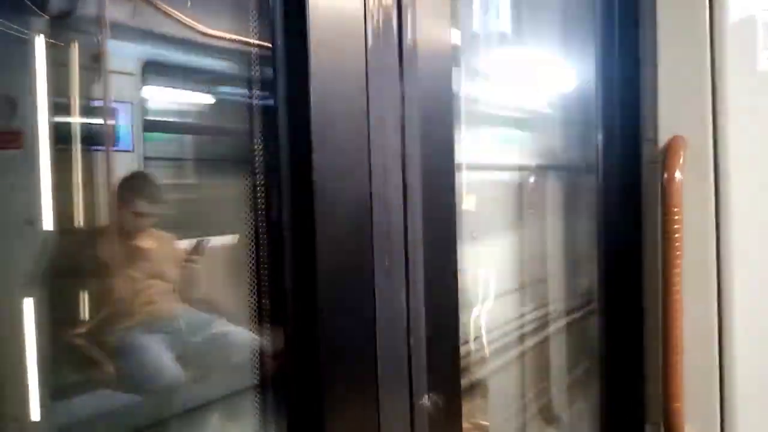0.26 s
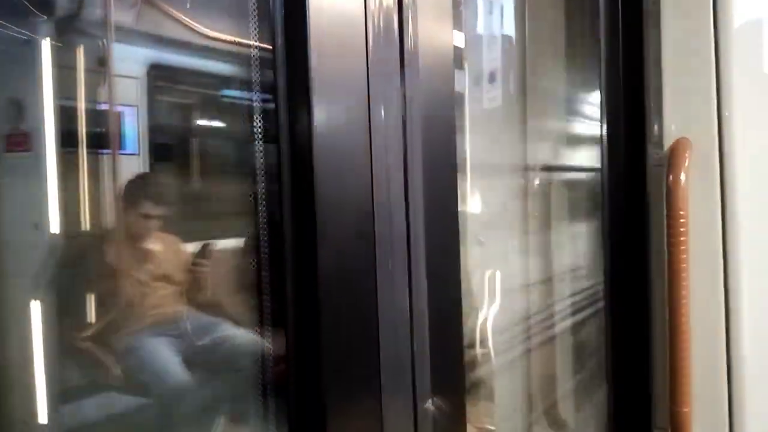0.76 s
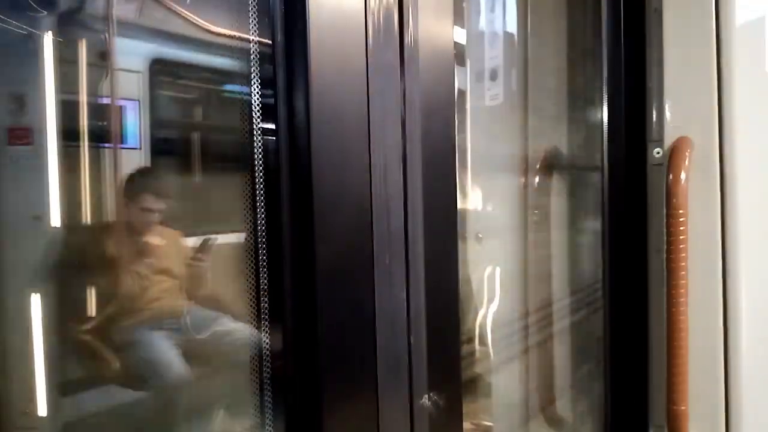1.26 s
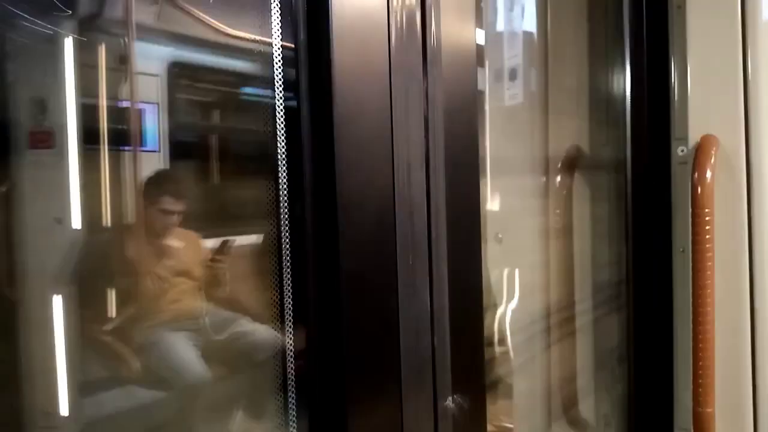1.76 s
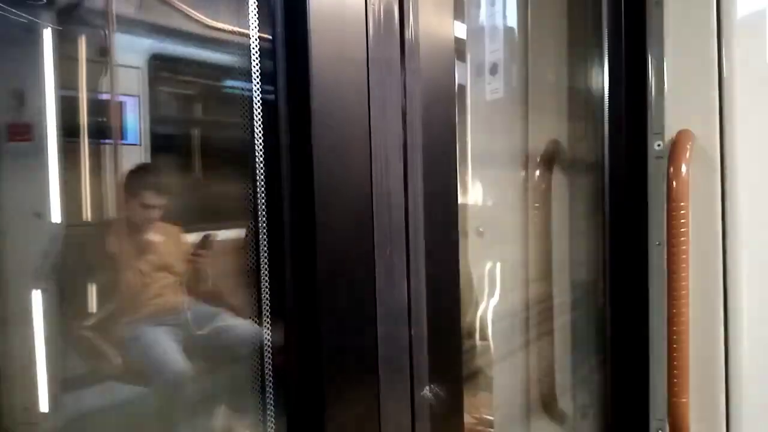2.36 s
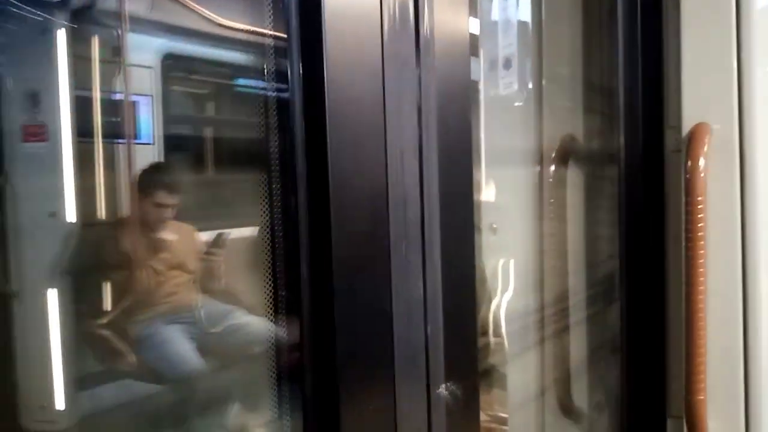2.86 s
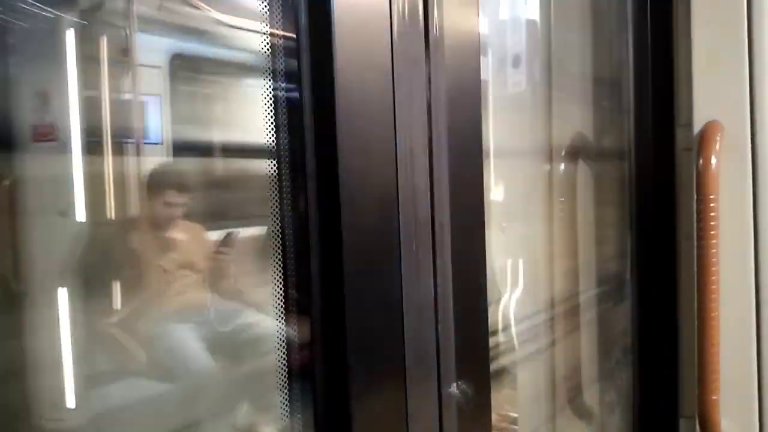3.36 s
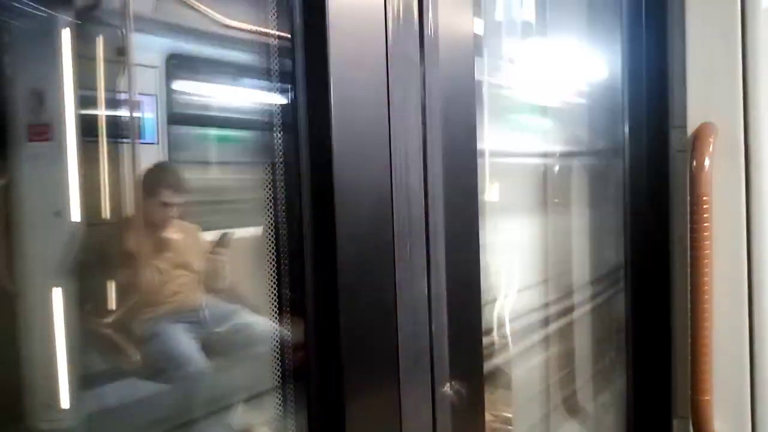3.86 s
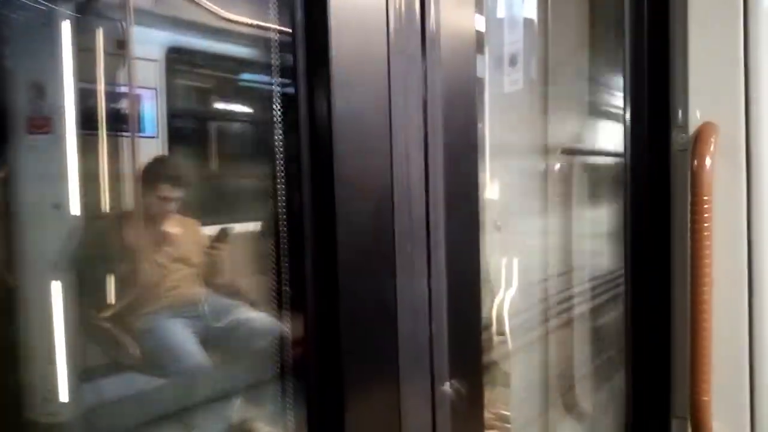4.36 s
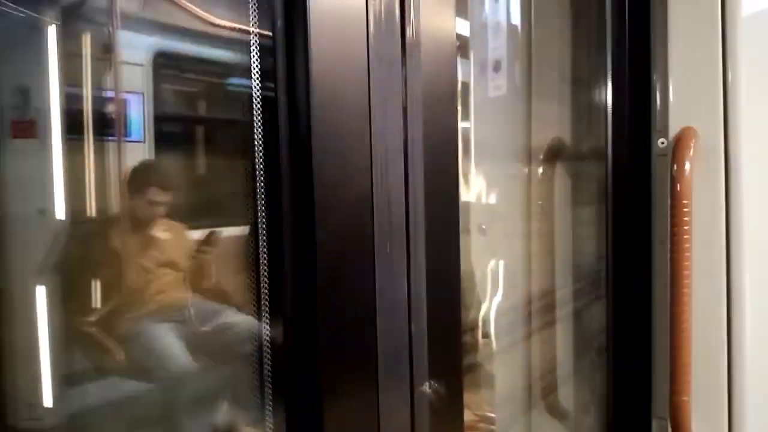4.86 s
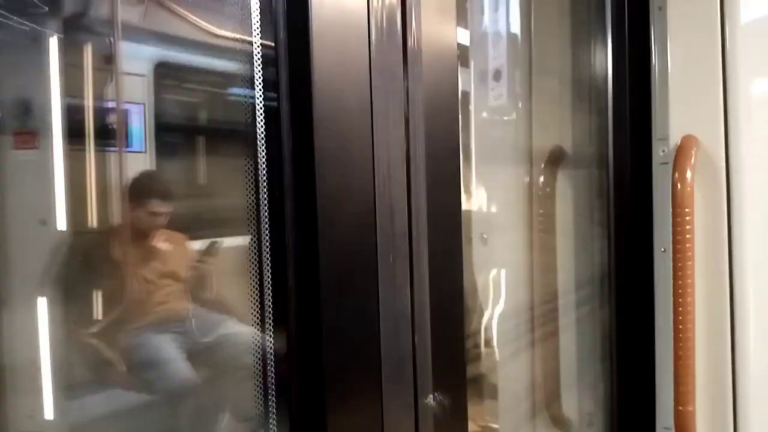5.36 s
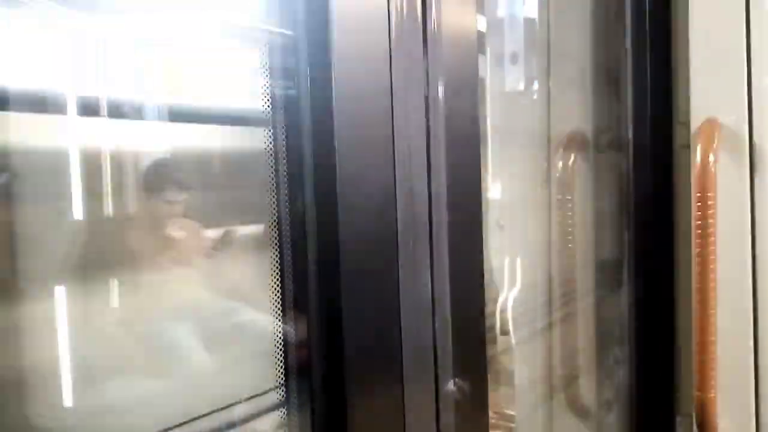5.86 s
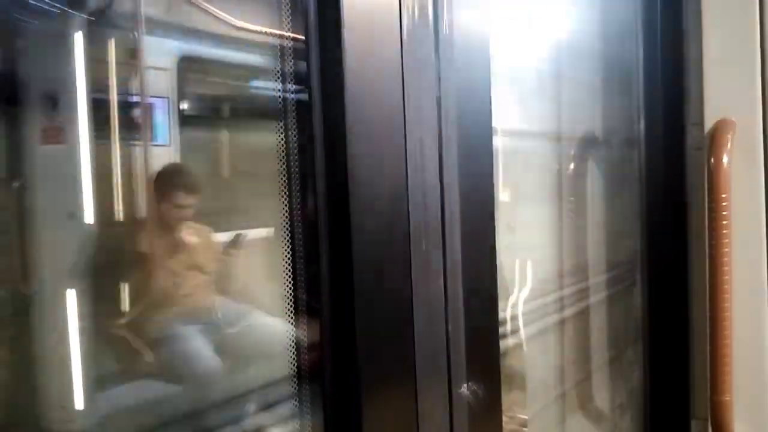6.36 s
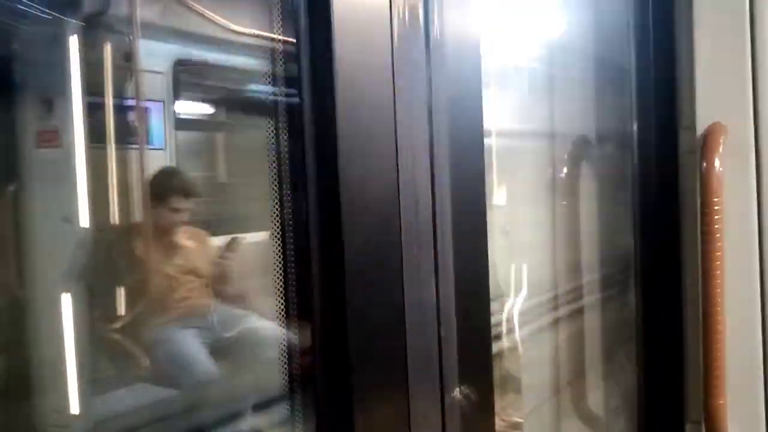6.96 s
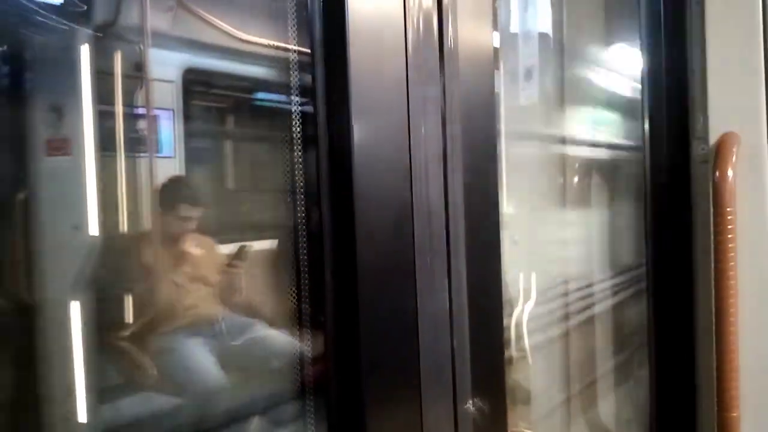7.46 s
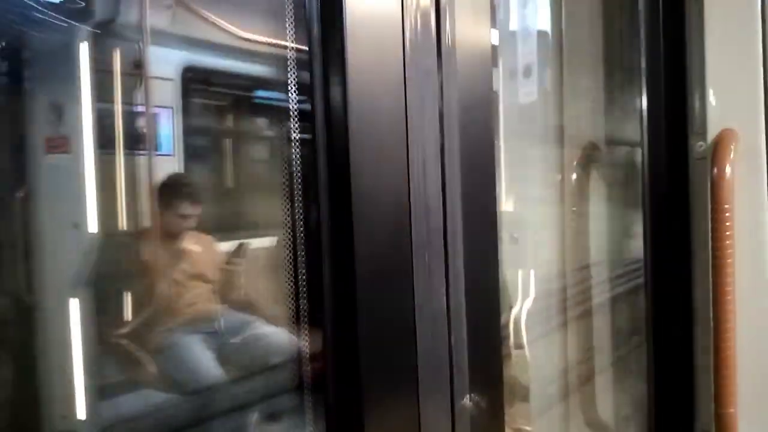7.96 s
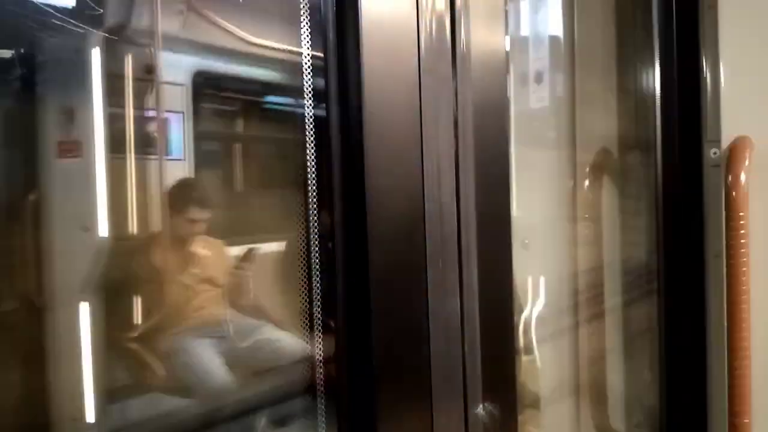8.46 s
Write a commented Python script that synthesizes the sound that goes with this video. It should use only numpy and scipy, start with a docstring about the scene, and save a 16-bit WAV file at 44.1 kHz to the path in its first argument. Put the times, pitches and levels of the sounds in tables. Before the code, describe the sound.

Close beside the doors inside a metro car, a deep body rumble surges over rough rail under a steady tunnel roar and soft hiss. A pure mid-pitched hum swells and fades, with a faint thin whistle above. Knocks begin after one second; gritty scuffs and tiny wheel squeals come later. The hardest knocks land near seven seconds. Door-side stereo, stronger on the left.

```python
"""A metro train runs at nearly steady speed through a tunnel, heard from beside the doors inside a car.
From the start the car body rumbles, surging on rough rail; the tunnel returns the wheels' roar, and
rail hiss leaks through the door seal. Gear teeth hum with the load and the switching drive whistles.
A slipping wheel first sings briefly at 0.2 s; from 1.3 s the bogie knocks against its stops,
and from 1.4 s flanges scuff the rail in short bursts of noise."""
import sys
import numpy as np
from scipy import signal
from scipy.fft import rfft, irfft, next_fast_len
from scipy.io import wavfile
from scipy.ndimage import uniform_filter1d, minimum_filter1d, map_coordinates

SR = 44100
rng = np.random.default_rng(int(sys.argv[2]) if len(sys.argv) > 2 else 0)


def int16_out(signal):
    """Quantize to a 16-bit WAV file."""
    q = np.round(np.clip(np.atleast_2d(signal).T, -1, 1) * 32767)
    wavfile.write(sys.argv[1], SR, q.astype(np.int16))


N = 383669


def amp(db):
    """Level definition: decibels to amplitude gain."""
    return 10 ** (np.asarray(db) / 20)


def unit(x):
    """Normalisation: scale to rms 1, a stereo pair by its left channel."""
    return x / np.std(np.atleast_2d(x)[0])


def times():
    """Uniform sampling: the time of each sample in seconds."""
    return np.arange(N) / SR


def freqs():
    """Discrete spectrum: the frequency of each bin in Hz, kept above zero for logarithms."""
    return np.fft.rfftfreq(next_fast_len(N, True), 1 / SR) + 1e-6


def curves(table):
    """Linear interpolation: the columns of a table, joined by straight lines in time."""
    s, *columns = np.transpose(table)
    return [np.interp(times(), s, column) for column in columns]


def contour(points):
    """Spectral envelope: (f/Hz, value) points joined on a log-frequency axis."""
    hz, value = np.transpose(points)
    return np.interp(np.log(freqs()), np.log(hz), value)


def resonances(modes):
    """Resonance: the lift in dB that a set of modes gives each frequency."""
    return sum(db / (1 + (2 * (freqs() - hz) / width) ** 2) for hz, width, db in modes)


def passband(hz, half_width):
    """Band selection: gain in dB, 12 dB down at the half-width, with extra loss in the far treble."""
    band_db = -40 * np.log10(1 + ((freqs() - hz) / half_width) ** 2)
    treble_loss_db = 10 * np.log10(1 + (freqs() / (2 * hz)) ** 10)
    return band_db - treble_loss_db


def swell(at_s, rise_s, fall_s):
    """Gaussian envelope: grows to 1 at a moment and dies away."""
    t = times() - at_s
    return np.exp(-np.minimum((t / np.where(t < 0, rise_s, fall_s)) ** 2, 20))


def walk(rate):
    """Random modulation: values of spread near 1, drawn rate times a second and joined by lines."""
    steps = rng.standard_normal(4096)
    # the lines between draws reduce the variance to 2/3
    return np.sqrt(3 / 2) * np.interp(times() * rate, np.arange(len(steps)), steps)


def drift(x, share, rate):
    """Time warping: the pitch of a stereo sound wanders by a small share."""
    place = np.arange(N) + np.cumsum(share * walk(rate))
    return np.array([map_coordinates(port, [place], order=1, mode="mirror") for port in x])


def white():
    """White noise: the spectrum of a fresh draw, equally strong at all frequencies on average."""
    return rfft(rng.standard_normal(next_fast_len(N, True)))


# shading of the right microphone port, which faces away from the door: f/Hz, level/dB
SHADE = [(50, -0.5), (140, -9), (290, -8), (360, -12), (470, -6.5), (600, -9), (780, -7), (1100, -11),
         (1700, -9), (2700, -11), (4200, -18.5), (7000, -16)]
# coherence of the two ports: f/Hz, coherence (0-1)
COHERENCE = [(30, 1), (130, 1), (310, 0.93), (400, 0.5), (530, 0.83), (660, 0.3), (840, 0.6), (1200, 0.2),
             (2800, 0.2), (4000, 0.2)]
PORT_LAG_MS = 1.0


def field(colour_db):
    """Partial coherence: the right port gets the noise later, shaded, and mixed with other reflections."""
    left = white()
    alike = np.clip(contour(COHERENCE), 0, 1)
    delayed = np.exp(-2j * np.pi * freqs() * PORT_LAG_MS / 1000) * left
    right = amp(contour(SHADE)) * (alike * delayed + np.sqrt(1 - alike ** 2) * white())
    return unit(irfft(np.array([left, right]) * amp(colour_db))[:, :N])


def tone(hz, scatter, flutter_rate, right_db, lag_ms):
    """Multipath interference: a steady tone plus changing tunnel-wall reflections at each port."""
    carrier = np.exp(2j * np.pi * np.cumsum(hz) / SR)
    ports = []
    for direct in (1, np.exp(-2j * np.pi * np.mean(hz) * lag_ms / 1000)):
        reflections = scatter * (walk(flutter_rate) + 1j * walk(flutter_rate))
        ports.append((carrier * (direct + reflections)).real)
    return unit(np.array(ports)) * amp([[0], [right_db]])


# spectrum of the rumble: f/Hz, relative level/dB
RUMBLE_COLOUR = [(18, -45.5), (30, -33), (50, -25.5), (64, -16), (76, -16.5), (108, -11), (135, -5.5),
                 (200, -1), (240, -4.5), (305, -3), (350, -10), (440, -16.5), (700, -26.5), (2000, -84)]
# resonances of the car body: f/Hz, width/Hz, lift/dB
BODY_MODES = [(75.5, 3.6, 6.5), (91, 6, 3.5), (138.8, 14, 8.5), (172, 4.2, 5), (193.7, 6.8, 2.5),
              (215.6, 8, 3)]
# rough patches of rail: t/s, half length/s, lift of the rumble/dB, ripple f/Hz
ROUGH_PATCHES = [(0.15, 0.16, 3, 202), (0.2, .08, 3, 75), (0.31, 0.045, 3.5, 140),
                 (0.542, 0.049, 11.5, 195), (1.165, 0.062, 10.5, 203), (1.3, .04, 7.5, 290),
                 (1.413, 0.06, 3, 302), (1.563, .04, 4, 302), (1.46, 0.044, 3.5, 150),
                 (1.72, 0.039, 7.5, 160), (1.997, 0.029, 1.5, 200), (2.12, 0.035, 6, 298),
                 (2.175, 0.096, 9, 182), (2.794, 0.034, 12.5, 242), (2.927, 0.085, 14.5, 150),
                 (3.277, 0.03, 3, 300), (3.433, 0.042, 4, 85), (3.75, 0.051, 5.5, 185),
                 (4.193, .05, 7, 194), (4.378, 0.051, 10.5, 214), (4.57, 0.1, 6.5, 175),
                 (4.832, 0.059, 5, 155), (4.977, 0.069, 10, 148), (5.08, 0.037, 9, 85),
                 (5.17, 0.044, 7, 300), (5.25, 0.053, 11.5, 149), (5.344, 0.13, 5.5, 297),
                 (5.754, 0.031, 5, 165), (6.14, 0.13, 5.5, 220), (6.582, 0.03, 5, 190),
                 (6.757, .035, 6, 300), (6.873, 0.058, 6.5, 151), (7.306, 0.069, 6.5, 184),
                 (7.779, 0.059, 10, 156), (8.29, 0.16, 5, 300), (8.42, 0.23, 5.5, 172),
                 (8.62, 0.16, 7, 239)]
# centres of the ranges in which the car body booms: f/Hz
RUMBLE_BANDS = [80, 140, 200, 300]
RUMBLE_DB = -16.5  # on smooth rail


def rumble(steadiness=0.33, reach_octaves=0.57):
    """Forced vibration: rail roughness drives the body's booming ranges, chosen by ripple spacing."""
    boom = rfft(field(contour(RUMBLE_COLOUR) + resonances(BODY_MODES)), next_fast_len(N, True))
    patches = [(db * swell(s, half, half), hz) for s, half, db, hz in ROUGH_PATCHES]
    out = 0
    for centre, share in zip(RUMBLE_BANDS, np.eye(len(RUMBLE_BANDS))):
        # neighbouring ranges cross-fade
        band = irfft(boom * contour(list(zip(RUMBLE_BANDS, share))))[:, :N]
        # the boom's own chance swells are evened by about a third; rough patches lift it further
        surge = uniform_filter1d(band[0] ** 2, size=SR // 7) / np.var(band[0])
        evened_band = band / surge ** (steadiness / 2)
        rough_db = sum(lift * np.exp(-(np.log2(centre / hz) / reach_octaves) ** 2)
                       for lift, hz in patches)
        out = out + evened_band * amp(RUMBLE_DB + rough_db)
    return out


# spectrum of the roar: f/Hz, relative level/dB
ROAR_COLOUR = [(150, -33), (380, 2), (500, -1.5), (590, 7.5), (690, 1.5), (830, -1.5), (1000, -2.5),
               (1400, -5), (2200, -8.5), (2900, -10.5), (4000, -32.5), (7000, -75)]
# ringing modes of the wheels: f/Hz, half-width/Hz, level/dB before ring_db and the roar's level
WHEEL_MODES = [(848, 19, -7), (1143, 61, -6.5), (1583, 80, -3.5), (2138, 150, -4), (2860, 96, -6.5)]
# roar thrown back by the tunnel walls: t/s, level/dB before trim_db
ROAR = [(0.0, -25.5), (0.85, -24.5), (1.5, -25), (2.2, -24.5), (3.8, -24.5), (4.7, -24.5), (5.6, -25),
        (6.6, -24.5), (7.7, -24.5), (8.7, -24)]


def roar(trim_db=6, flicker_db=0.5, ring_db=-12, wander_db=1.84):
    """Radiation and reflection: the tunnel returns the wheels' sound; each mode drifts and flares."""
    level_db, = curves(ROAR)
    wash = field(contour(ROAR_COLOUR)) * amp(flicker_db * walk(15))
    rings = 0
    for hz, half_width, db in WHEEL_MODES:
        ring = drift(field(passband(hz, half_width)), share=.007, rate=4)
        rings = rings + ring * amp(db + ring_db + wander_db * walk(8.3))
    return (wash + rings) * amp(level_db + trim_db)


# spectrum of the hiss: f/Hz, relative level/dB
HISS_COLOUR = [(900, -27), (2000, -8), (2700, -9), (3400, 2.5), (4100, 0), (4800, -5.5), (5200, -10.5),
               (5900, -12.5), (6500, -19), (7100, -29), (7700, -43.5), (8300, -70), (12000, -61.5),
               (15000, -72)]
HISS_DB = -29


def hiss(flicker_db=1.2):
    """Rolling contact noise: steel rolling on steel hisses through the door seal."""
    return field(contour(HISS_COLOUR)) * amp(HISS_DB + flicker_db * walk(24))


# gear pitch, following the speed: t/s, f/Hz
GEAR_PITCH = [(0, 633), (.5, 631.5), (1.7, 631.4), (3, 632.5), (4, 633), (5.5, 634), (6.5, 634.7),
              (8.7, 635.6)]
# load on the gears, as the level of their hum: t/s, level/dB before trim_db
GEAR_LOAD = [(0.0, -48), (0.1, -36), (0.27, -27), (0.48, -29.5), (0.57, -31), (0.66, -26), (1.1, -37.5),
             (1.37, -37), (1.52, -36), (1.66, -33), (1.75, -36), (1.88, -33.5), (2.15, -28), (2.3, -23.5),
             (2.45, -33), (2.8, -30), (3.3, -37), (3.6, -33.5), (3.8, -41), (4.05, -26.5), (4.4, -28),
             (4.54, -36), (4.64, -25), (4.93, -30.5), (5.08, -23.5), (5.2, -31), (5.6, -34), (6.03, -33),
             (6.13, -24.5), (6.4, -30), (6.73, -26), (6.82, -39), (6.95, -46), (7.08, -29), (7.65, -37),
             (8.15, -32), (8.69, -43)]


def gear_hum(trim_db=6.0):
    """Tooth-mesh excitation: the gear teeth sing one pure note that comes and goes with the load."""
    hz, = curves(GEAR_PITCH)
    load_db, = curves(GEAR_LOAD)
    note = tone(hz, scatter=0.027, flutter_rate=10, right_db=-14.0, lag_ms=0.34)
    return note * amp(load_db + trim_db)


# tones of the drive: f/Hz, level/dB relative to the whistle
DRIVE_TONES = [(2040, -14), (2104, -12.5), (2222, -13.5), (2357.5, 1.5), (2491.7, -6), (2762, -7.5),
               (4715, -11)]
# whistle as it comes and goes: t/s, level/dB
WHISTLE = [(0, -39), (.45, -40), (.72, -37), (1.0, -38.5), (1.27, -43), (1.5, -37.5), (2.0, -35.5),
           (2.2, -41), (2.45, -40), (2.72, -38.5), (2.92, -45), (3.1, -38), (3.35, -35.5), (3.58, -39.5),
           (4.05, -35), (4.35, -33), (4.56, -39.5), (4.9, -51), (5.07, -34), (5.4, -41), (5.7, -39.5),
           (6.22, -36), (6.5, -43), (6.72, -41), (7.35, -44), (8.17, -37.5), (8.45, -42), (8.7, -40)]


def drive_whistle(waver_hz=1.2):
    """Magnetic excitation: windings whistle tones, each wavering on its own, that swell and fade together."""
    level_db, = curves(WHISTLE)
    tones = 0
    for hz, db in DRIVE_TONES:
        wavering_hz = hz + waver_hz * walk(5)
        tones = tones + amp(db) * tone(wavering_hz, scatter=0.32, flutter_rate=13,
                                       right_db=-16.5, lag_ms=0.99)
    return tones * amp(level_db)


# moments when a wheel sings: t/s, half length/s, f/Hz, level/dB
SQUEALS = [(0.225, .12, 2850, -32), (3.17, 0.041, 2046, -22), (3.926, 0.064, 1606, -26),
           (3.922, 0.023, 2840, -25), (5.528, .011, 2134, -20.5), (5.544, .011, 3340, -19),
           (5.545, .021, 2820, -19), (7.04, 0.29, 912, -33), (7.69, 0.11, 792, -24)]


def squeals():
    """Self-excited vibration: a slipping wheel briefly locks onto one of its modes and sings."""
    out = 0
    for s, half, hz, db in SQUEALS:
        ring = tone(np.full(N, hz), scatter=.4, flutter_rate=80, right_db=-7, lag_ms=.5)
        out = out + ring * swell(s, half, half) * amp(db)
    return out


# knocks from the bogie: t/s, level/dB, floor thud level/dB, pitch ratio
KNOCKS = [(1.294, -8, -15.5, 0.94), (1.343, -10, -29, 1.12), (2.756, -10, -14, 0.94), (2.871, -8.5, -31, 1),
          (3.809, -17, -17.5, 1.26), (4.462, -6, -29, 0.97), (4.478, -7.5, -38, 1.03),
          (4.5, -5.5, -44, .99), (4.933, -4.5, -33, 0.96), (5.295, -7.5, -31, 0.92), (6.764, -2, -26, .985),
          (6.815, -12, -29, 1.1), (6.894, 2.5, -19, 1.005), (6.926, -5.5, -34, 1), (7.023, -29, -18, 1)]
# what a knock rings with: f/Hz, level/dB before the ring is scaled to peak 1, t60/s
KNOCK_MODES = [(313, 6.5, 0.083), (521, -5, 0.075), (790, -3, 0.08), (831.5, 6, 0.11), (874, -6, 0.055),
               (1043, -7, 0.11), (1138, -0.5, 0.062), (1313, -12, 0.13), (1444, -16, 0.13),
               (1920, -14.5, 0.19)]
# what the floor thuds with: f/Hz, level/dB relative to the thud, t60/s
FLOOR_MODES = [(77.2, -0.5, 0.5), (91, -4.5, 0.37)]


def knocks(car_t60_s=0.35, tail_db=-6, right_db=-8, ring_spread=0.0042, push_s=0.0013,
           floor_rise_s=0.018, clatter_db=-18, clatter_t60_s=0.18):
    """Impact and modal decay: bogie blows on the stops ring, clatter in the panels and thud in the floor."""
    t = np.arange(SR // 2) / SR

    def decaying_modes(modes, ratios):
        """Modal superposition: sines that each lose 60 dB in their t60."""
        return sum(amp(db - 60 * t / t60) * np.sin(2 * np.pi * hz * ratio * t)
                   for (hz, db, t60), ratio in zip(modes, ratios))

    thud = decaying_modes(FLOOR_MODES, np.ones(len(FLOOR_MODES))) * (1 - np.exp(-t / floor_rise_s))
    panels = signal.butter(4, [300, 1600], "bandpass", fs=SR, output="sos")
    out = np.zeros((2, N + SR))
    for s, db, thud_db, pitch in KNOCKS:
        detune = pitch * (1 + ring_spread * rng.standard_normal(len(KNOCK_MODES)))
        ring = decaying_modes(KNOCK_MODES, detune)
        ring = ring * (1 - np.exp(-t / push_s)) ** 2  # a rubber stop pushes softly
        ring = ring / np.abs(ring).max()
        for port, (lag_ms, port_db) in enumerate([(0, 0), (PORT_LAG_MS, right_db)]):
            reverberation = rng.standard_normal(len(t)) * amp(-60 * t / car_t60_s)
            tail = unit(signal.fftconvolve(ring, reverberation)[:len(t)]) * np.std(ring)
            rattle = unit(signal.sosfilt(panels, rng.standard_normal(len(t))))
            clatter = rattle * amp(clatter_db - 60 * t / clatter_t60_s)
            blow = amp(db) * (ring + clatter + amp(tail_db) * tail) + amp(thud_db) * thud
            start = int((s + lag_ms / 1000) * SR)
            out[port, start:start + len(t)] += amp(port_db) * blow
    return out[:, :N]


# flange scuffs: t/s, rise/s, fall/s, level/dB, centre f/Hz, half-width/Hz
SCUFFS = [(1.42, 0.11, 0.081, -35.5, 4550, 1520), (2.38, 0.09, 0.095, -22.5, 2500, 1400),
          (2.83, 0.023, 0.05, -29, 4080, 1510), (3.06, 0.033, 0.1, -36.5, 4850, 1700),
          (3.16, 0.052, 0.1, -22, 2800, 1700), (3.929, 0.0035, 0.01, -15, 3080, 800),
          (3.945, 0.048, 0.13, -23, 3240, 1410), (3.93, 0.037, 0.09, -22.5, 1760, 900),
          (5.545, 0.016, 0.025, -23, 3100, 800), (5.62, 0.077, 0.083, -28, 3170, 1390),
          (6.33, 0.03, 0.15, -25.5, 2980, 984), (7.92, 0.035, 0.065, -24.5, 3180, 1410),
          (8.428, .004, 0.013, -23.5, 3180, 695), (8.51, 0.048, 0.086, -24, 3280, 750)]
# resonances that a scuffing flange wakes: f/Hz, width/Hz, lift/dB
FLANGE_MODES = [(2850, 90, 3.5), (3110, 70, 2.5), (3350, 190, 4), (3740, 67, 6)]


def scuffs(grit_db=0.9):
    """Stick-slip friction: a flange brushes the rail unevenly, waking resonances in one band of the wheel."""
    grit = amp(grit_db * walk(160))
    ringing = resonances(FLANGE_MODES)
    out = 0
    for s, rise, fall, db, hz, half_width in SCUFFS:
        rub = field(passband(hz, half_width) + ringing)
        out = out + rub * swell(s, rise, fall) * amp(db)
    return grit * out


def scene():
    """Superposition: rolling noise, machine tones, squeals, knocks and scuffs add together."""
    rolling = rumble() + roar() + hiss()
    machines = gear_hum() + drive_whistle()
    return rolling + machines + squeals() + knocks() + scuffs()


TOP_HZ = 15400


def record(dry, knee_db=-14.5, squeeze=0.74, follow_s=0.023):
    """Compression: gain falls while it is loud, so hiss ducks; then peaks are limited and the top cut."""
    pole = np.exp(-1 / (follow_s * SR))
    loudness = np.sqrt(signal.lfilter([1 - pole], [1, -pole], dry[0] ** 2))
    held = dry * np.maximum(loudness / amp(knee_db), 1) ** -squeeze
    headroom = 1 / np.maximum(np.abs(held[0]) / .83, 1)
    limiter = uniform_filter1d(minimum_filter1d(headroom, size=SR // 200), size=SR // 200)
    fade_in = np.sin(np.pi / 2 * np.minimum(times() / .001, 1))
    top_cut = signal.ellip(8, .2, 70, TOP_HZ, fs=SR, output="sos")
    return signal.sosfilt(top_cut, held * limiter * fade_in)


dry = scene()
out = record(dry)
int16_out(out)
```